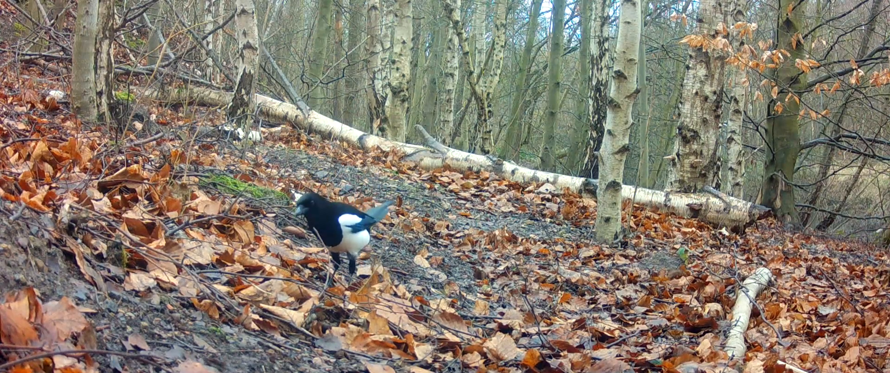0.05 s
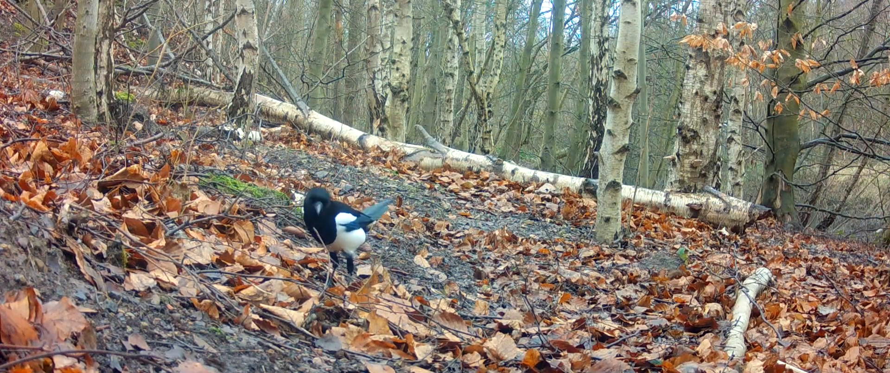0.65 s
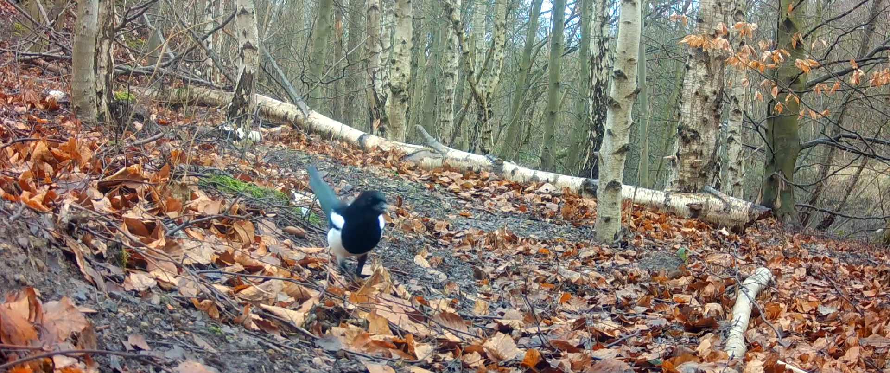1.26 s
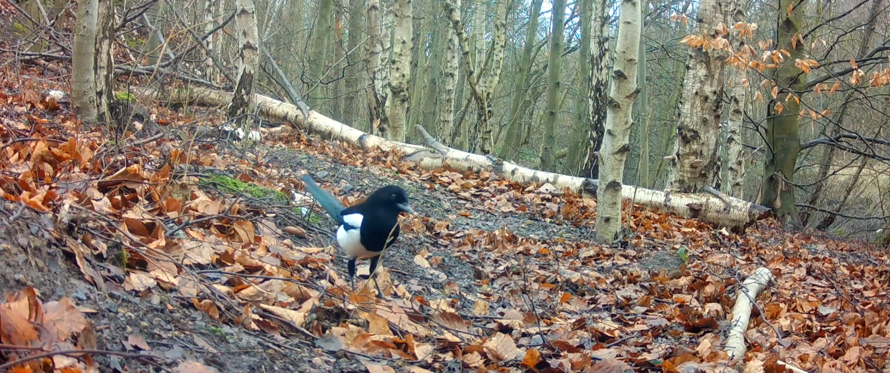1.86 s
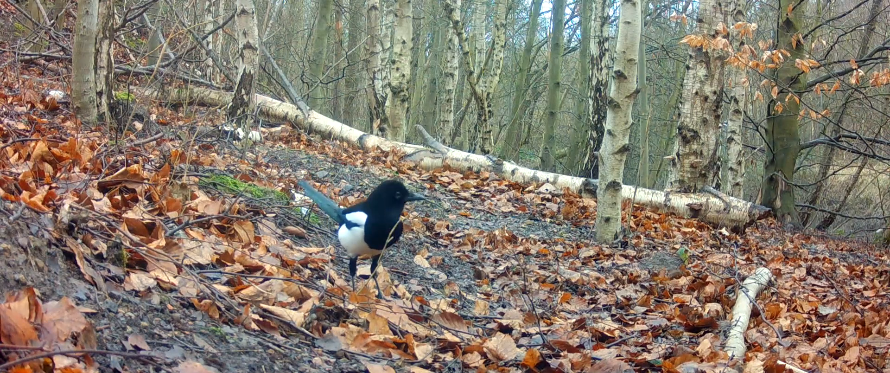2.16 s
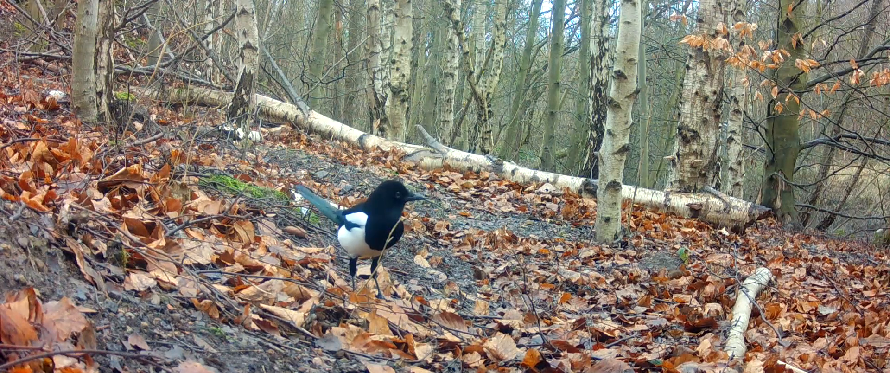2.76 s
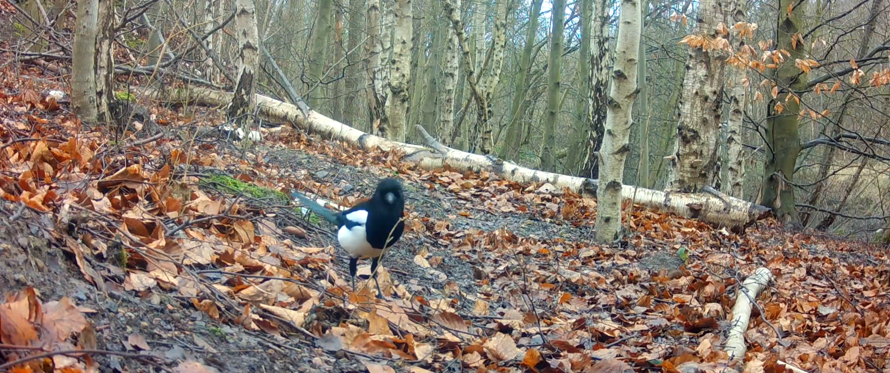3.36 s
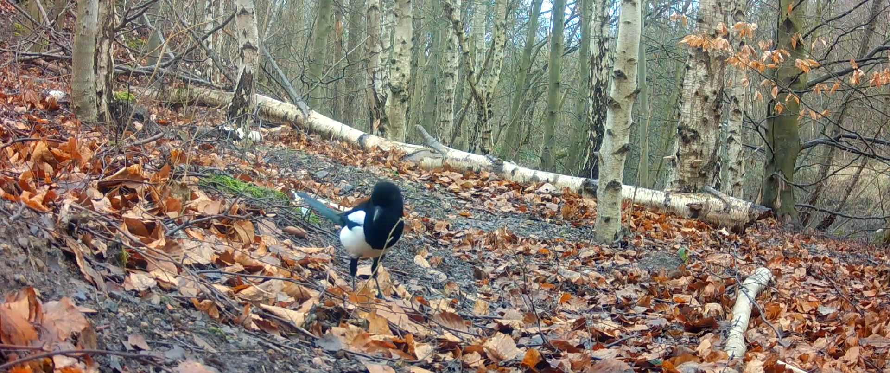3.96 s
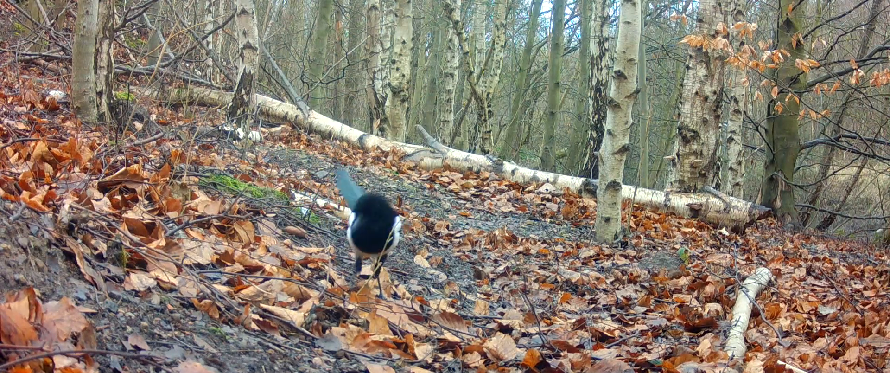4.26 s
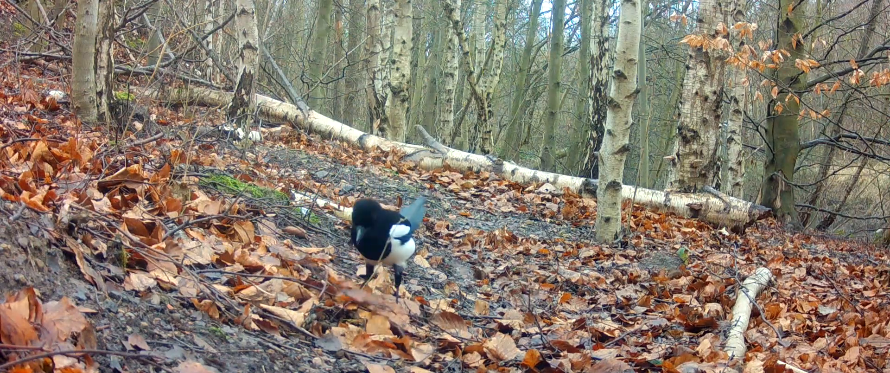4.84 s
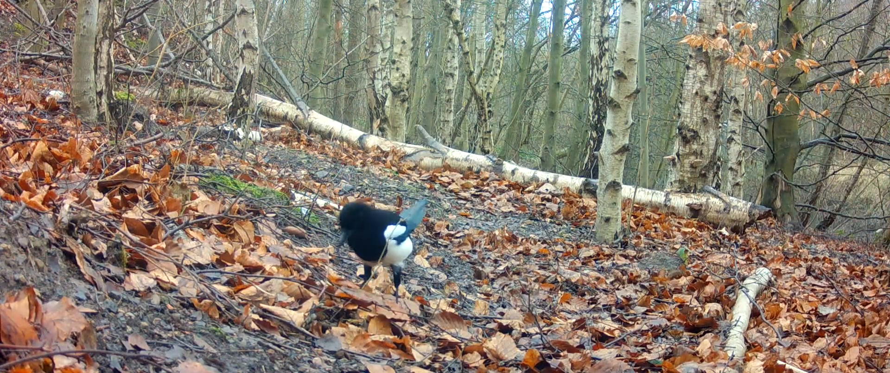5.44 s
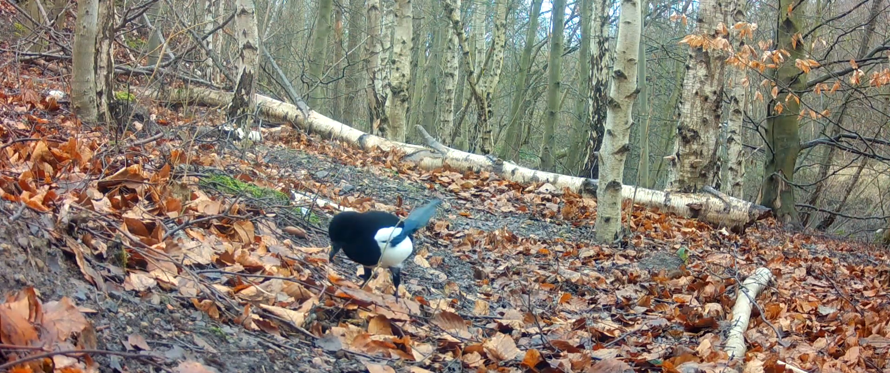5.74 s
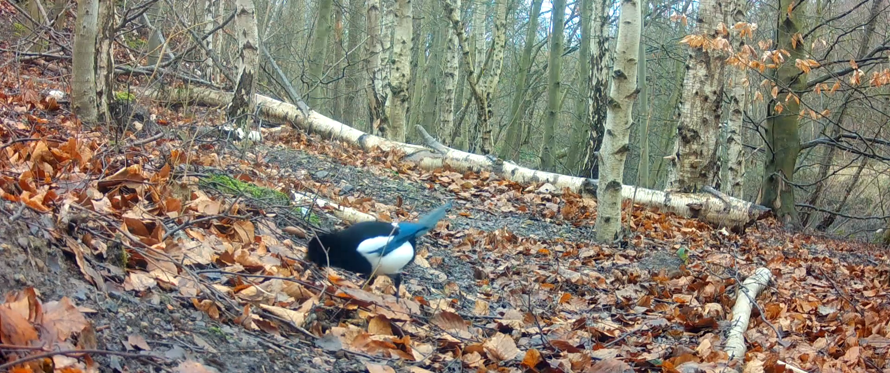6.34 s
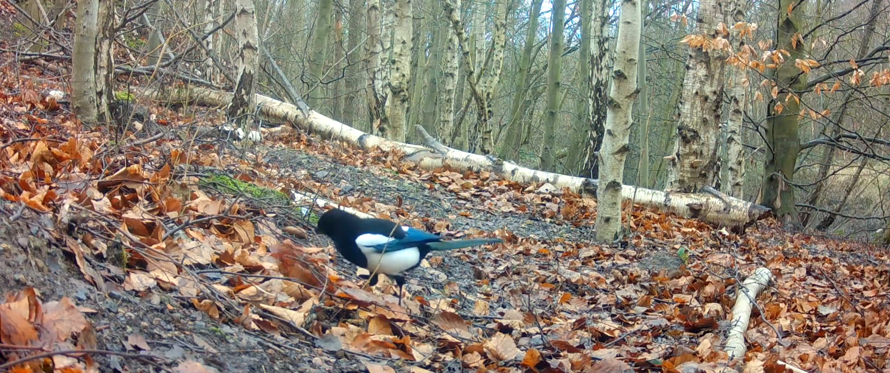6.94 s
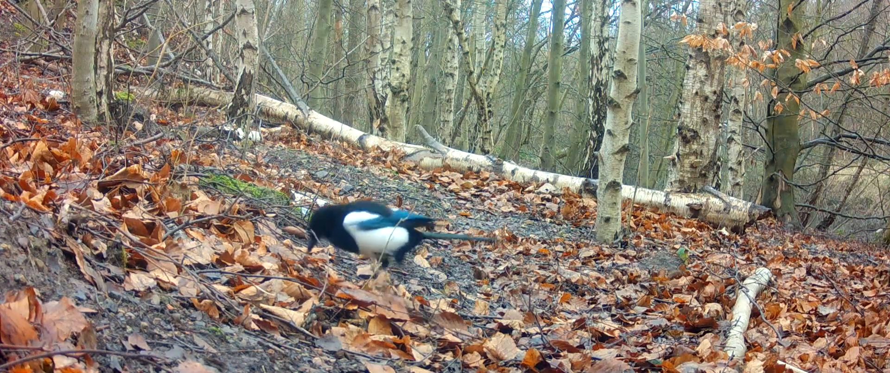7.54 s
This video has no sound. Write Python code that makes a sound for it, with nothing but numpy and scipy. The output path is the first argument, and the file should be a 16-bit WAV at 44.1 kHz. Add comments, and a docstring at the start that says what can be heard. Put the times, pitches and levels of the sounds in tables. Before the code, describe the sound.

A magpie close to the microphone squawks twice, a few seconds apart, each brief raspy call overloading it slightly and leaving a short woodland echo. Right after the second call comes a soft crunch of dry leaves as the bird hops and pecks, then a small bird's faint thin whistles and more light rustling. A distant magpie calls now and then over a low, steady rush of air.

```python
"""A woodland floor, one microphone, a soft distant rush and a thin whine from the recorder's electronics.
A magpie calls on and off far among the trunks. At 1.3 s a close magpie gives a harsh call: its two-sided
syrinx sounds a fast warbling tone against a lower one, and the loudest swings overload the microphone.
It calls again at 4.4 s, then hops and pecks in dry leaves. A small bird's faint whistles follow;
the leaves stir again and the far magpie calls last."""
import sys
import numpy as np
from scipy import signal
from scipy.fft import rfft, irfft, next_fast_len
from scipy.io import wavfile
from scipy.ndimage import uniform_filter1d, map_coordinates

SR = 44100
rng = np.random.default_rng(int(sys.argv[2]) if len(sys.argv) > 2 else 0)


def materialize(psi):
    """Save the field psi as 16-bit PCM at rate SR to the path in sys.argv[1].

    A 1-D psi becomes a single channel; in a 2-D psi each row is a channel.
    """
    bounded = np.clip(np.atleast_2d(psi).T, -1, 1)
    quanta = np.round(bounded * 32767).astype(np.int16)
    wavfile.write(sys.argv[1], SR, quanta)


N = 335160


def undb(db):
    """Decibels to gain."""
    return 10 ** (np.asarray(db) / 20)


def unit(x):
    """Scale to rms 1."""
    return x / np.sqrt(np.mean(x ** 2) + 1e-20)


def add(out, start, x):
    """Mix x into out from start seconds on."""
    i = int(round(start * SR))
    x = x[max(-i, 0):max(N - i, 0)]
    out[max(i, 0):max(i, 0) + len(x)] += x


def colour(x, points):
    """Filter by a curve of (frequency [Hz], gain [dB]) points."""
    hz, db = np.transpose(points)
    size = next_fast_len(len(x) + 2048)
    bin_hz = np.maximum(np.fft.rfftfreq(size, 1 / SR), 1)
    gain = undb(np.interp(np.log(bin_hz), np.log(hz), db))
    return irfft(rfft(x, size) * gain, size)[:len(x)]


def wander(n, rate):
    """Smooth random drift with spread near 1 and about rate turns a second."""
    place = np.arange(n) * rate / SR
    return map_coordinates(rng.standard_normal(int(place[-1]) + 2), [place], order=2, mode="nearest")


def woods(t60=0.91, early_db=10, early_s=0.046, build_s=0.015, treble_t60=0.43, patchy_db=3):
    """Echo of the wood: a quick scatter from the ground, then many trunks, the treble dying first."""
    t = np.arange(int(1.5 * SR)) / SR
    scatter = rng.standard_normal(len(t)) * undb(patchy_db * wander(len(t), 300))
    dull = signal.sosfilt(signal.butter(2, 3800, fs=SR, output="sos"), scatter)
    bright = signal.sosfilt(signal.butter(2, 3800, "high", fs=SR, output="sos"), scatter)
    trunks = dull * np.exp(-np.log(1000) * t / t60) - bright * np.exp(-np.log(1000) * t / treble_t60)
    ground = undb(early_db) * scatter * np.exp(-t / early_s)
    echo = ground + trunks * (1 - np.exp(-t / build_s))
    return echo / np.sqrt(np.sum(echo ** 2))


# spectrum of the far rush: (frequency [Hz], gain [dB])
RUSH_SPECTRUM = [(25, -14), (110, -15), (230, -10.5), (400, -10.5), (620, -9), (920, -3), (1400, -6),
                 (2000, -9.5), (2800, -19.5), (3800, -27.5), (5000, -39), (6500, -48.5), (10000, -56.5),
                 (15500, -66)]
# a distant whine, then the high whine of the electronics: (frequency [Hz], width [Hz], level [dB])
WHINE_BANDS = [(1284, 12, -69.5), (7800, 120, -95.5)]


def rush_and_whines(level_db=-55.5, swell_db=.15, flutter_db=.35):
    """A soft far rush with a faint distant whine, plus a thin whine from the recorder's electronics."""
    rush = unit(colour(rng.standard_normal(N), RUSH_SPECTRUM))
    out = rush * undb(level_db + swell_db * wander(N, 1.2) + flutter_db * wander(N, 13))
    for hz, width, db in WHINE_BANDS:
        phase = 2 * np.pi * hz * np.arange(N) / SR
        out += undb(db) * (wander(N, width) * np.sin(phase) + wander(N, width) * np.cos(phase))
    return out


# a small bird's notes: (time [s], length [s], start pitch [Hz], end pitch [Hz], level [dB])
BIRD_NOTES = [(3.801, 0.082, 4030, 3430, -70.5), (4.04, .03, 7620, 6000, -93),
              (5.198, 0.034, 4650, 4930, -67), (5.374, 0.027, 5660, 6300, -66.5),
              (5.45, .045, 6820, 6180, -71), (5.529, .038, 5950, 4040, -65.5),
              (5.605, 0.04, 5930, 6000, -70.5)]


def small_bird(echo_db=3, quaver=.008):
    """Thin gliding whistles that linger in the wood, faint at the microphone."""
    out = np.zeros(N)
    for start, length, from_hz, to_hz, db in BIRD_NOTES:
        n = int(length * SR)
        hz = np.linspace(from_hz, to_hz, n) * (1 + quaver * wander(n, 363))
        add(out, start, undb(db) * np.sin(2 * np.pi * np.cumsum(hz) / SR) * signal.windows.tukey(n, .5))
    return out + undb(echo_db) * signal.fftconvolve(out, woods(early_db=-3.5, treble_t60=0.4))[:N]


# calls from far among the trunks: (time [s], echo level [dB], pitch [ratio])
FAR_MAGPIE_CALLS = [(-.13, -59.5, 1.02), (.45, -54.5, 1.03), (3.239, -54.5, 0.99), (3.814, -63, 1.07),
                    (4.10, -54.5, 1.02), (5.02, -59, 1.22), (6.973, -55.5, 1.09)]
# the far magpie's throat, heard through the trees: (frequency [Hz], gain [dB])
THROAT_THROUGH_TREES = [(700, -26.5), (1500, -6.5), (2000, -4), (2450, 1.35), (2950, -3.5), (3500, -10),
                        (4300, -9), (5200, -12.5), (6100, -24.5), (8000, -42.5), (15000, -52.5)]


def far_magpie(direct_db=-14):
    """Calls like the second close one from far off, mostly echo; the throat narrows for higher calls."""
    out = np.zeros(N)
    for start, db, pitch in FAR_MAGPIE_CALLS:
        throat = [(hz * pitch, gain_db) for hz, gain_db in THROAT_THROUGH_TREES]
        call = unit(syrinx(CLOSE_CALLS[1], throat, pitch, rough_jitter=.25, octave_db=-9.5, rasp_db=17))
        add(out, start, undb(db) * signal.fftconvolve(call, woods(t60=1.6, early_db=6, early_s=.06)))
        add(out, start, undb(db + direct_db) * call)
    return out


# spells of shuffling: (time [s], length [s], start level [dB], end level [dB], treble lift [dB])
SHUFFLE_SPELLS = [(4.577, 0.5, -51, -58.5, -1), (6.46, 0.1, -65.5, -65.5, -8),
                  (6.692, 0.12, -63.5, -65, -3)]


def shuffling(count=12, scatter_db=2, decay_s=0.016):
    """Soft crushes underfoot, spread unevenly over each spell, as rows like HOPS_AND_PECKS."""
    rows = []
    for start, length, from_db, to_db, lift_db in SHUFFLE_SPELLS:
        for k, (when, size) in enumerate(rng.random((count, 2))):
            part = (k + when) / count
            db = from_db + (to_db - from_db) * part + scatter_db * (2 * size - 1)
            rows.append((start + length * part, db, decay_s, lift_db))
    return rows


# the close magpie's feet and beak in the litter: (time [s], level [dB], decay [s], treble lift [dB])
HOPS_AND_PECKS = [(1.001, -48.5, 0.0051, -10), (1.666, -45.5, 0.0038, -9), (4.645, -47, 0.016, -1),
                  (4.698, -42.5, 0.0094, -1), (4.722, -45, 0.0019, 20), (4.739, -40.5, 0.0054, 7.5),
                  (4.843, -47, 0.0073, 1.5), (6.507, -48.5, .006, -3), (6.741, -57.5, 0.023, -1.5),
                  (6.82, -49.5, 0.014, -4), (6.848, -52, .012, 2), (6.878, -47, 0.0028, -7)]
# snap of a dry leaf: (frequency [Hz], gain [dB])
LEAF_SPECTRUM = [(150, -21.5), (600, -5.5), (1500, 6.5), (2500, 3.5), (4000, -2.5), (6500, -16.5),
                 (9000, -26.5), (15000, -42)]


def leaves(snaps_per_s=7000, spread_db=2.5, press_share=0.33, settle_db=-15, settle_s=0.018, echo_db=-10):
    """Each step or peck crushes dry leaves: tiny snaps swell and fade, then the litter settles."""
    out = np.zeros(N)
    t = np.arange(SR // 5) / SR
    for start, db, decay, lift_db in HOPS_AND_PECKS + shuffling():
        snaps = (rng.random(len(t)) < snaps_per_s / SR) * rng.choice([-1, 1], len(t))
        sizes = undb(spread_db * np.minimum(rng.exponential(size=len(t)), 3))
        press = 1 - np.exp(-t / (press_share * decay))
        relax = np.exp(-t / decay) + undb(settle_db) * np.exp(-t / settle_s)
        crush = colour(snaps * sizes * press * relax, LEAF_SPECTRUM)
        crush = colour(crush, [(2000, 0), (6000, lift_db)])
        add(out, start, undb(db) * unit(crush) * np.sqrt(decay / t[-1]))
    return out + undb(echo_db) * signal.fftconvolve(out, woods(early_db=7.5))[:N]


ATTACK_S, ONSET_DB, STEP_LAG_S, STEP_SAG_DB = 0.037, 28, 0.0032, 4.5
BREAK_S, RELEASE_S, RELEASE_DB = 0.0028, 0.034, 32
START_SWING_HZ, CLOSING_SWING_HZ = 994.3, 296
SHARP_HZ, SETTLE_S = 653.8, 0.014
STALL_S, STALL_SHARE = 0.014, 0.4
LOW_START_DB, LOW_BREAK_DB, LOW_END_DB = -17, -9.5, -3  # lower voice against the upper
ONSET_ROUGH, WARBLE_ROUGH, CLOSING_ROUGH = 0.16, 0.07, 0.9


def gesture(call, low_arch=0.12, low_pull=0.06):
    """Course of a call: it swells and climbs while warbling, then breaks, drops and dies away rough."""
    _, length, db, rate_hz, from_hz, to_hz, swing_hz, dip_db, low_hz, closing_hz, closing_db = call
    t = np.arange(0, length + RELEASE_S, 1 / SR)
    climb = np.minimum(t / length, 1)
    broken = np.clip((t - length) / BREAK_S + .5, 0, 1)
    fade = np.maximum(t - length, 0) / RELEASE_S
    # on its last turn before the break the warble stalls near the top of its swing
    stall = STALL_SHARE * np.clip(2 * (t - length + STALL_S) / STALL_S, 0, 1) * (1 - broken)
    swing = 1 - (1 - stall) * np.sin(np.pi * rate_hz * t) ** 2
    width_hz = START_SWING_HZ + (swing_hz - START_SWING_HZ) * climb
    base_hz = from_hz + (to_hz - from_hz) * np.sin(np.pi / 2 * climb) ** 2
    # the slack first turns start sharp and settle
    warble_hz = base_hz + SHARP_HZ * np.exp(-t / SETTLE_S) + width_hz * swing ** 1.3
    high_hz = (1 - broken) * warble_hz + broken * (closing_hz + CLOSING_SWING_HZ * swing)
    # the level rises in steps, one just after the top of each swing; each early step sags again
    turn, within = np.divmod((t - STEP_LAG_S) * rate_hz, 1)
    slack = np.maximum(1 - turn / rate_hz / ATTACK_S, 0)
    shortfall_db = ONSET_DB * slack ** 2.1 + STEP_SAG_DB * np.sqrt(slack) * within
    warble_db = db - uniform_filter1d(shortfall_db, size=64)
    level_db = (1 - broken) * warble_db + broken * (closing_db - RELEASE_DB * fade ** 1.2)
    # the lower voice arches in pitch, is pulled along by the warble and gains on the upper one
    arch = 1 - low_arch * (2 * t / t[-1] - 1) ** 2 + low_pull * (swing - .5)
    low_db = LOW_START_DB + (LOW_BREAK_DB - LOW_START_DB) * climb + (LOW_END_DB - LOW_BREAK_DB) * fade
    rough = WARBLE_ROUGH + (ONSET_ROUGH - WARBLE_ROUGH) * slack
    rough = np.clip(rough + (CLOSING_ROUGH - WARBLE_ROUGH) * fade ** .45, 0, 1)
    return swing, high_hz, low_hz * arch, level_db, low_db, dip_db * (1 - broken), rough


def syrinx(call, throat, pitch=1, jitter=.012, rough_jitter=0.17, octave_db=-15, reediness=.35,
           sum_db=-5, low_octave_db=-14, rasp_db=-3, low_jitter=.02, uneven_db=0.95):
    """Two membranes sound together, one warbling; they modulate each other and break into rasp."""
    swing, high_hz, low_hz, db, low_db, dip_db, rough = gesture(call)
    n = len(swing)
    high_hz = high_hz * (1 + (jitter + rough_jitter * rough) * wander(n, 1100))
    low_hz = low_hz * (1 + (low_jitter + rough_jitter * rough) * wander(n, 1100))
    high_phase, low_phase = (2 * np.pi * np.cumsum(pitch * hz) / SR for hz in (high_hz, low_hz))
    # the soft, clear start of a call is reedier than its middle
    octave = undb(octave_db + reediness * (db.max() - db) * (1 - rough))
    upper = np.sin(high_phase) + octave * np.sin(2 * high_phase)
    # the warbling membrane swings less as it tightens, and no two turns are alike
    upper *= undb(-dip_db * swing + uneven_db * wander(n, 160))
    # both membranes gate the same air stream, which makes a tone at the sum of their pitches
    sum_tone = undb(sum_db) * (1 + swing) * np.sin(high_phase + low_phase)
    lower = np.sin(low_phase) + undb(low_octave_db) * np.sin(2 * low_phase) + sum_tone
    rasp = undb(rasp_db) * (0.12 + 2 * rough) * rng.standard_normal(n)
    flow = np.sqrt(2) * ((1 - 0.11 * rough) * upper + undb(low_db) * lower) + rasp
    return colour(flow * undb(db) * signal.windows.tukey(n, .03), throat)


# rising warbles that break into a rasp: (time [s], warble length [s], level [dB], warble rate [Hz],
# base pitch at the start [Hz], base pitch at the break [Hz], swing at the break [Hz],
# dip at the top of each swing [dB], lower voice [Hz], closing pitch [Hz], closing level [dB])
CLOSE_CALLS = [ (1.2942, 0.1145, -9, 87.83, 1893, 2424, 900, 6.5, 1689, 1853, -7.5),
               (4.416, 0.121, -10.5, 85.23, 1640, 2429, 398.5, 3.5, 1500, 2315, -12)]
# throat and beak, shaped anew for each call: (frequency [Hz], gain [dB])
FIRST_CALL_THROAT = [(500, -40), (1000, -21), (1400, 2), (1900, -1), (2350, 3), (2750, -7.5), (3350, -12),
                     (3650, -18), (4050, -11.5), (5000, -7.5), (6100, -19), (9000, -39), (15000, -56)]
SECOND_CALL_THROAT = [(500, -27), (1000, 1), (1400, -0.5), (1900, -2), (2350, -0.5), (2750, 0),
                      (3350, -6.5), (4200, -8.5), (4700, -20), (5400, -9.5), (6100, -23.5), (9000, -43),
                      (15000, -60.5)]
# what trunks and litter send back to the microphone: (frequency [Hz], gain [dB])
ECHO_SPECTRUM = [(1000, -0.5), (2000, -2), (2600, 0.5), (3400, 1.5), (4300, 3.5), (4900, -1.5), (5700, 4),
                 (9000, -8.5)]


def close_magpie(first_echo_db=-24, second_echo_db=-25):
    """Two harsh calls close to the microphone, and their echo from the ground and the trunks."""
    first, second = np.zeros(N), np.zeros(N)
    call = CLOSE_CALLS[0]
    voice = syrinx(call, FIRST_CALL_THROAT, octave_db=-11.5, sum_db=-1, rasp_db=4, low_jitter=0.025)
    add(first, call[0], voice)
    call = CLOSE_CALLS[1]
    voice = syrinx(call, SECOND_CALL_THROAT, octave_db=-14.5, sum_db=-1, rasp_db=2.5, low_jitter=0.055)
    add(second, call[0], voice)
    first_echo = signal.fftconvolve(first, woods(t60=1.22, early_db=9.5, early_s=.025, treble_t60=.28))
    second_echo = signal.fftconvolve(second, woods(t60=.68, early_db=5.5, early_s=.037, treble_t60=.673))
    echo = undb(first_echo_db) * first_echo + undb(second_echo_db) * second_echo
    return first + second + colour(echo[:N], ECHO_SPECTRUM)


def scene():
    """Everything heard from the woodland floor, with the whine of the electronics, in mono."""
    return (close_magpie() + far_magpie() + small_bird() + leaves() + rush_and_whines())[None]


# crackle of the overloaded microphone: (frequency [Hz], gain [dB])
CRACKLE_SPECTRUM = [(25, -1), (170, -2.5), (330, -1), (560, -1.5), (900, 1.5), (1300, -2.5), (3000, -10),
                    (6000, -20), (9000, -25.5), (12000, -31), (15500, -33)]


def record(dry, overload_db=-16, crackle_db=-5, crackle_limit=0.21, knee=0.0496, ceiling=0.79,
           top_hz=15550):
    """The overloaded microphone crackles, thumps and rounds off the peaks; the top is cut off."""
    x = dry[0]
    overload = undb(overload_db)
    loudness = np.sqrt(np.abs(uniform_filter1d(x ** 2, size=150)))
    excess = knee * np.logaddexp(0, (loudness - overload) / knee)
    drive = crackle_limit * np.tanh(excess / crackle_limit) * np.tanh(loudness / overload)
    crackle = drive * unit(colour(rng.standard_normal(N), CRACKLE_SPECTRUM))
    # lopsided overload turns each loud swing into a low thump, and two voices into their difference tone
    peaks = np.maximum(x ** 2 - 2 * overload ** 2, 0)
    thump = colour(peaks, [(10, -19.5), (40, -2), (90, -5.5), (180, 4), (400, -4), (850, 6.5),
                           (1100, 1.5), (1700, -19), (4000, -34.5)])
    x = x + undb(crackle_db) * crackle + thump
    rounded = x / (1 + (x / ceiling) ** 6) ** (1 / 6)
    return signal.sosfilt(signal.ellip(10, .2, 80, top_hz, fs=SR, output="sos"), rounded)[None]


dry = scene()
out = record(dry)
materialize(out)
```